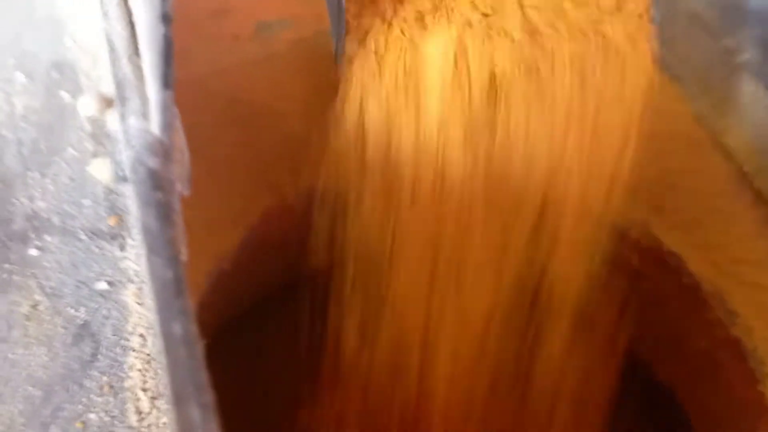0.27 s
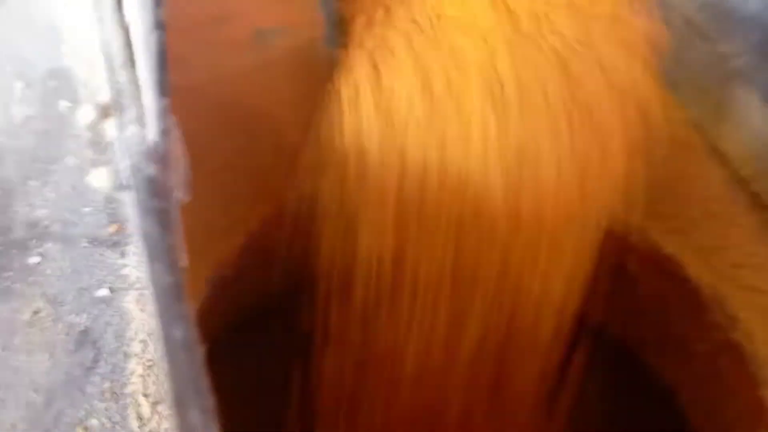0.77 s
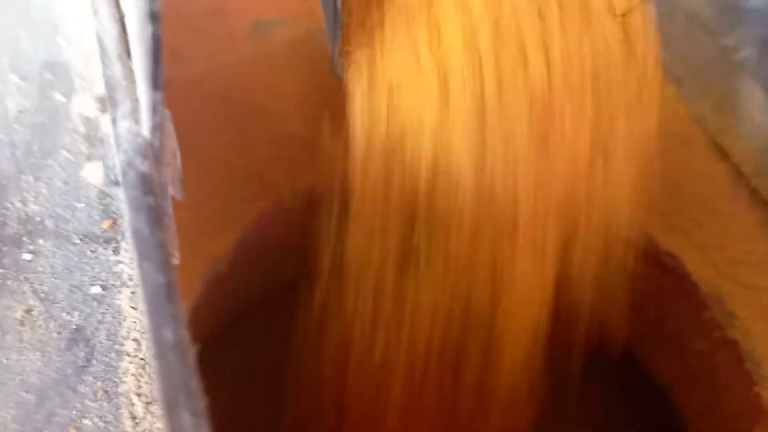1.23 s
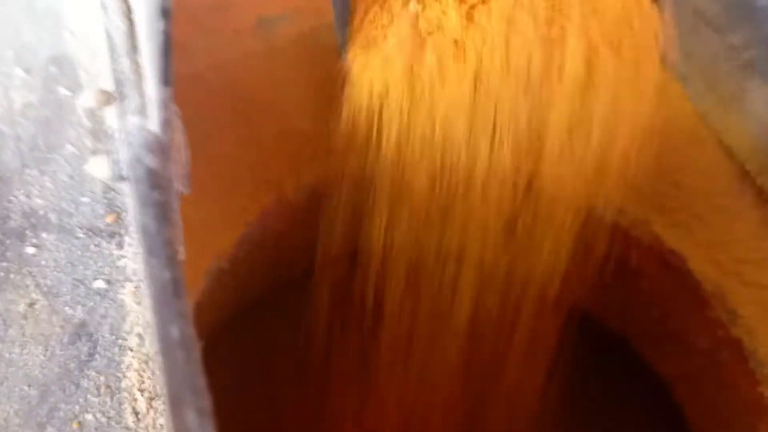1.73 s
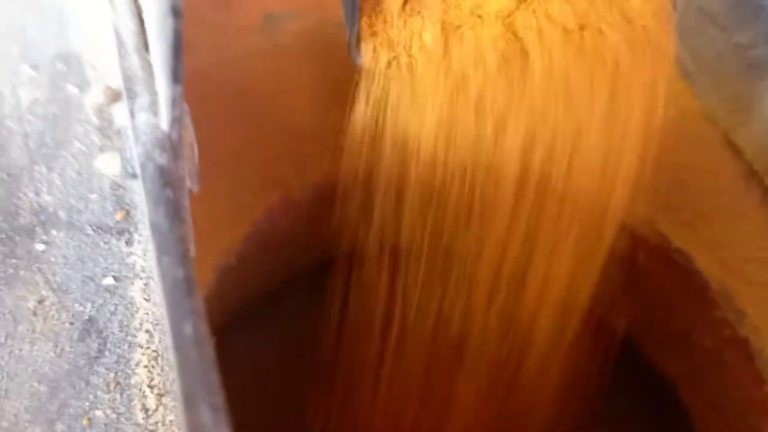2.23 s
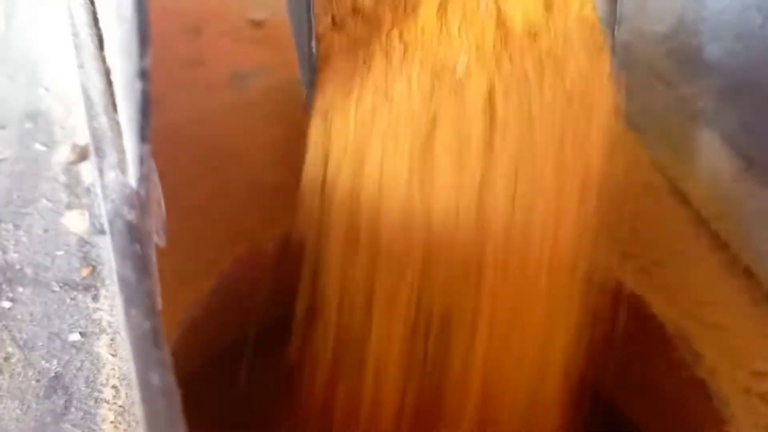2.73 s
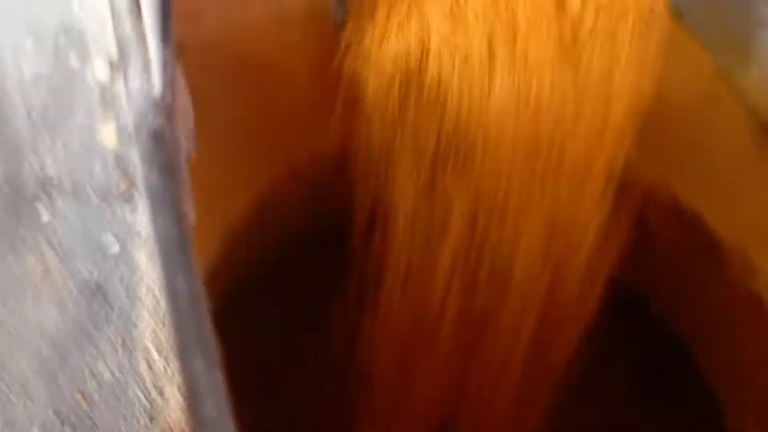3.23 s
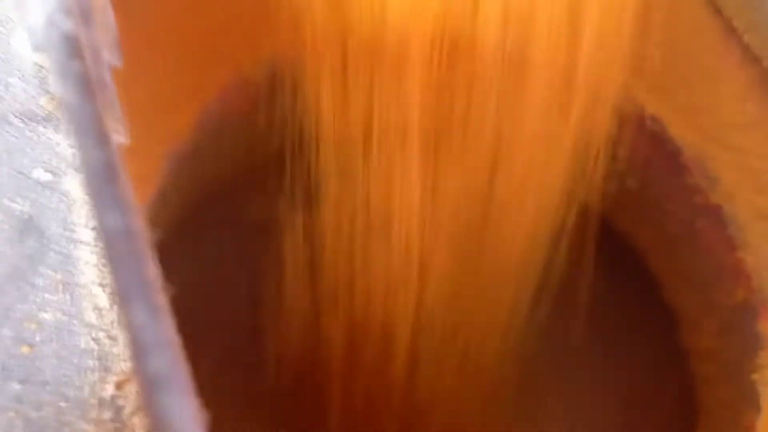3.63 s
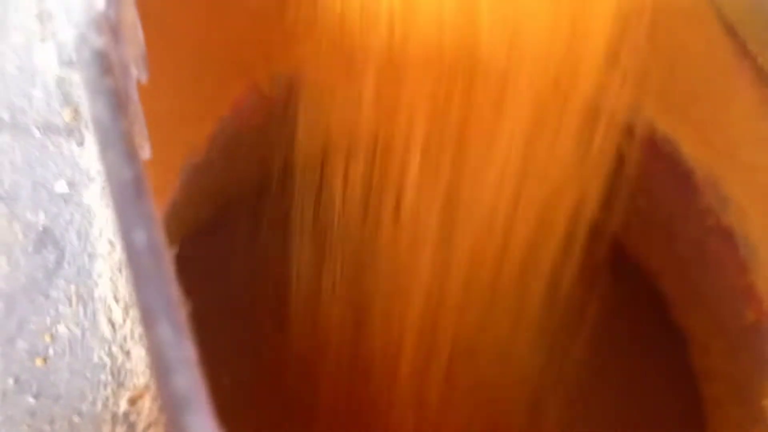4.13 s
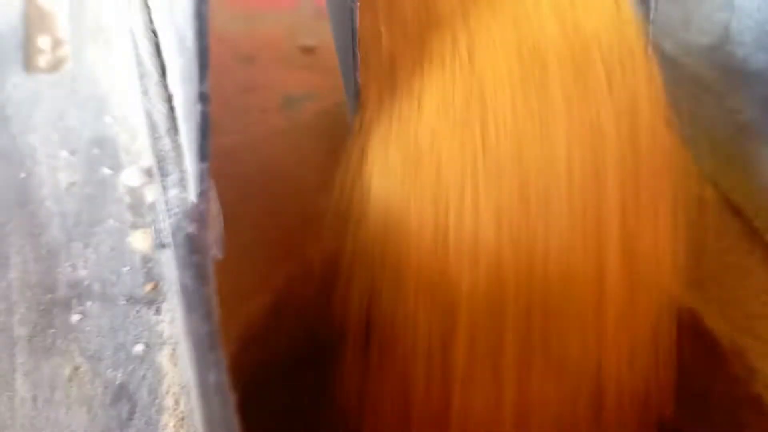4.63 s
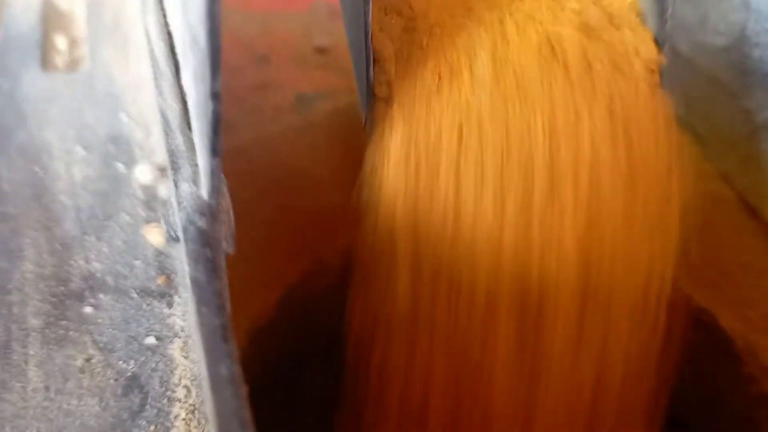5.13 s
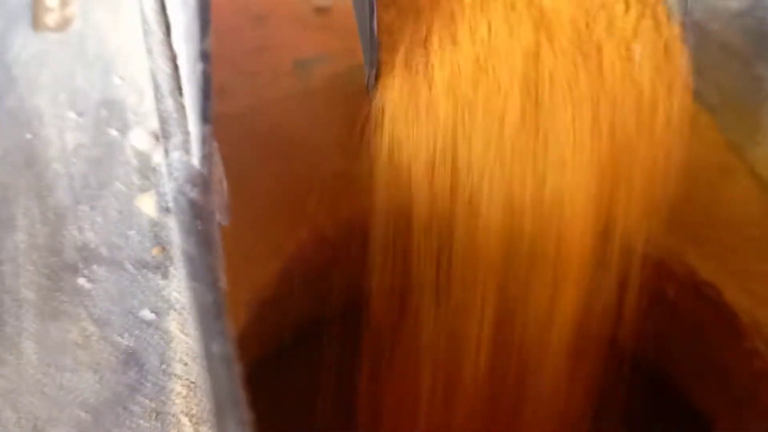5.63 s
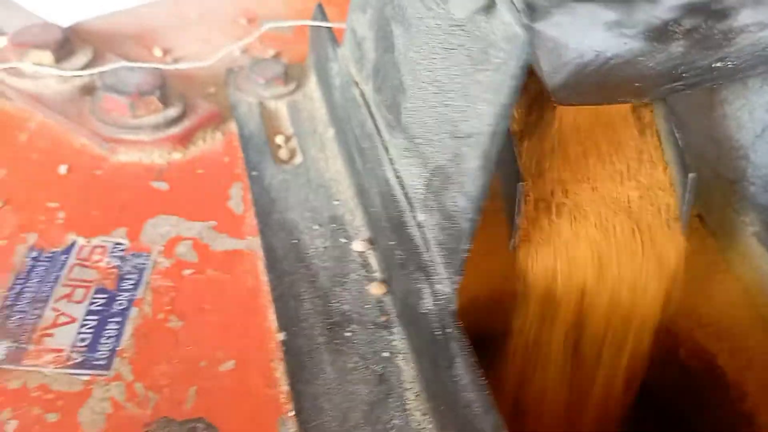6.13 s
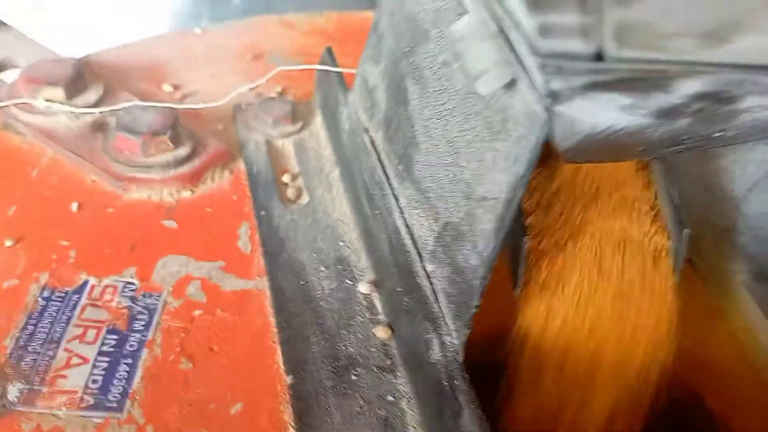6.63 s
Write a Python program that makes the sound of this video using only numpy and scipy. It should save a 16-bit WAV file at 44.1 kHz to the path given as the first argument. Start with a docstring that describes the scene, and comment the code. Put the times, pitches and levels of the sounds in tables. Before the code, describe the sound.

A grain mill roars overwhelmingly loud and close, a throbbing low-mid growl with rattling blows and hissing kernels, then weakens slightly near the end.

```python
"""Beside a steel chute a hammer mill grinds grain, so close that the microphones overload.
The rotor hums in tones on multiples of its hammer beat, which sags under load; the frame rumbles in filtered noise.
Slugs of grain and drive knocks ring the housing's modes over its throbbing noise roar; kernels hiss and ring plates.
Near the end the scene jumps from below the chute to its other side, with the feed thin and the roar weaker."""
import sys
import numpy as np
from scipy import signal
from scipy.io import wavfile
from scipy.ndimage import uniform_filter1d

SR = 44100
rng = np.random.default_rng(int(sys.argv[2]) if len(sys.argv) > 2 else 0)


def master_out(mix):
    """Clip the mix to full scale and print it as 16-bit PCM to the path in sys.argv[1]."""
    frames = np.transpose(np.atleast_2d(mix))
    ceiling = np.clip(frames, -1, 1)
    pcm = np.round(ceiling * 32767).astype(np.int16)
    wavfile.write(sys.argv[1], SR, pcm)


N = 303849

# Rotor hum. Each row: multiple of the pass rate, level below the chute in dB, level beside it in dB,
# dB gained for each pass a second lost to load.
HUM_TONES = [(1, -25, -26.5, 0.65), (2, -22, -28, -0.28), (3, -10.5, -14, -0.5), (3.5, -21, -44, 0.5),
             (4, -15.5, -19.5, -1.48), (4.5, -20, -23.5, -2.7)]
# Roar of the housing, below and beside the chute. Each row: frequency in Hz, relative density in dB per Hz.
ROAR_COLOUR_BELOW = [(60, -58), (150, -22), (260, -15), (330, 0.5), (420, 3), (520, -0.5), (600, -16),
                     (750, -29), (840, -11.5), (950, -20.5), (1500, -31.5), (1720, -28.5), (1900, -64),
                     (2400, -46.5)]
ROAR_COLOUR_BESIDE = [(40, -52), (150, -32), (260, -19.5), (330, -2), (450, 4), (560, 1.5), (640, -16.5),
                      (780, -20.5), (1100, -18.5), (1600, -18.5), (2400, -40.5)]
# Hiss of breaking kernels. Each row: frequency in Hz, relative density in dB per Hz.
HISS_COLOUR = [(880, -3), (1500, -13), (1800, 2), (2370, -1.5), (2770, -2), (3020, -1.5), (3460, -4.5),
               (4590, -8.5), (5310, -8), (6140, -12), (6970, -6), (7610, -7.5), (10100, -1), (11100, -3.5),
               (15300, -29.5)]
# Steel plates rung by grain, ahead of their shared drifting gain. Each row: frequency in Hz,
# width of the sharper resonance in Hz, level below the chute in dB, level beside it in dB, against the hiss.
CHUTE_PLATES = [(2965, 66, -13, -10.5), (5340, 34, -22.5, -20), (7220, 330, -17.5, -16),
                (9000, 200, -40, -27), (9830, 54, -14, -12)]
# Stereo likeness of the roar. Each row: frequency in Hz, left-right likeness from 0 to 1.
ROAR_LIKENESS = [(60, 0.6), (400, 1), (700, 0.96), (1300, 0.43), (2400, 0.12)]
# Stereo lean, below and beside the chute. Each row: frequency in Hz, left minus right in dB.
STEREO_LEAN_BELOW = [(60, -11), (150, 6), (380, 1), (940, -1.5), (2370, 1), (5930, 2), (14900, 7.5)]
STEREO_LEAN_BESIDE = [(60, -5.5), (150, 0), (380, -1), (940, -4.5), (2370, 0), (5930, -0.5), (14900, 2.5)]
# Rotor speed before its small flutter. Each row: time in seconds, hammer passes a second.
ROTOR_SPEED = [(0, 115.2), (1.1, 115.2), (1.35, 116), (1.6, 114.7), (2.25, 114.7), (2.65, 116.7),
               (3, 116.9), (3.85, 114), (4.25, 113.8), (4.65, 115.1), (4.95, 115.1), (5.65, 110.7),
               (5.95, 110.2), (5.99, 116.8), (6.89, 116.7)]
# Housing modes rung by a blow. Each row: frequency in Hz, width in Hz, level in dB.
HOUSING_MODES = [(166.8, 5.3, -4.5), (278, 32, 1.5), (400.8, 19.5, 15.5), (503.8, 27, 7.5), (862, 98, -5),
                 (1296, 95, -2), (1684, 98, -9.5)]
# Grain in the mill. Each row: time in seconds, level against a full feed in dB.
GRAIN_FEED = [(0, 1), (.28, 0.5), (.55, 0), (.94, 1), (1.1, -1), (1.4, -2), (1.55, 0.5), (2.3, 1),
              (2.5, -4.5), (2.8, -10.5), (3.1, -6.5), (3.3, 0), (4.3, 0.5), (4.65, -1.5), (5.0, 0.5),
              (5.94, 1), (6, -11), (6.89, -9)]

STEP_S = 5.97  # the jump to the other side of the chute
LEAD_S = 9e-5  # the nearer microphone hears the mill this much earlier
EDGE_HZ = 15470  # top of the recorded band
IDLE_HZ, START_PASS = 117.2, .35  # unloaded passes a second; pass count at the start
MAINS_HZ, MAINS_DB = 100, -37
# Levels at a full feed in dB, then dB gained for each dB of feed
ROAR_DB, ROAR_PER_FEED, ROAR_BESIDE_DB = -6, 0.39, -0.5
THUDS_DB, THUDS_PER_FEED = -24.5, 2.4
RUMBLE_DB, RUMBLE_PER_FEED = -64, 0.89
RUMBLE_DB_PER_LOAD = 6  # for each pass a second lost
HISS_DB, HISS_BESIDE_DB, HISS_PER_FEED = -25.5, -2.5, -0.064  # a thin feed sounds brighter
KNOCK_EVERY, KNOCK_AT = 12, 2  # passes per cycle of the drive, and the pass that knocks
KNOCK_DB, HALFWAY_DB = -35, -4.5  # a weaker knock follows half a cycle later
KNOCK_BESIDE_DB = 0.5


def gain_of(db):
    """Turn dB into amplitude."""
    return 10 ** (np.asarray(db) / 20)


def evened(x):
    """Bring a signal to rms 1."""
    return x / np.sqrt(np.mean(x ** 2) + 1e-20)


def read(points, hz):
    """Read a curve along a logarithmic frequency axis."""
    f, value = np.transpose(points)
    return np.interp(np.log(hz + 1), np.log(f + 1), value)


def beside(t):
    """0 below the chute, 1 beside it, with a 25 ms crossfade."""
    return np.clip((t - STEP_S) / 0.025 + .5, 0, 1)


def wander(rate_hz):
    """Random drift of rms 1, slower than the given rate."""
    b, a = signal.butter(2, rate_hz, fs=SR)
    drift = signal.lfilter(b, a, rng.standard_normal(N + SR))
    return evened(drift[SR:])  # drop the filter's first second


def resonate(x, hz, width_hz):
    """A two-pole resonance, brought to rms 1."""
    r = np.exp(-np.pi * width_hz / SR)
    poles = [1, -2 * r * np.cos(2 * np.pi * hz / SR), r * r]
    return evened(signal.lfilter([1, 0, -1], poles, x))


def noise(size, below, aside, same, patchy_db):
    """Two channels of random short-time spectra in drifting patches, coloured for each place, rms 1 overall."""
    hop = size // 4
    frames, hz = N // hop + 5, np.fft.rfftfreq(size, 1 / SR)
    a, b, c, d, patches = rng.standard_normal((frames, len(hz), 5)).T
    patches = uniform_filter1d(patches, 8, 0)  # smooth along frequency
    patches = evened(uniform_filter1d(patches, 8, 1))  # then along time
    place = beside(np.arange(frames) * hop / SR)
    colour_below, colour_beside = [evened(gain_of(read(s, hz)))[:, None] for s in (below, aside)]
    colour = (1 - place) * colour_below + place * colour_beside
    like = np.clip(same(hz), 0, 1)[:, None]
    left = a + 1j * b
    right = like * left + np.sqrt(1 - like ** 2) * (c + 1j * d)
    spectra = np.array([left, right]) * colour * gain_of(patchy_db * patches)
    return evened(signal.istft(spectra, nperseg=size, noverlap=size - hop)[1][:, :N])


def feed():
    """Grain in the mill at every sample, dB."""
    return np.interp(np.arange(N) / SR, *np.transpose(GRAIN_FEED))


def rotor_turns():
    """Hammer passes counted up with a slight flutter, and the load as passes a second lost."""
    hz = np.interp(np.arange(N) / SR, *np.transpose(ROTOR_SPEED))
    fluttering_hz = hz * (1 + .0012 * wander(12))
    return START_PASS + np.cumsum(fluttering_hz) / SR, IDLE_HZ - hz


def frame(load):
    """Low rumble of the shaking frame, nearly alike in both microphones; grows with feed and load."""
    shared, left, right = rng.standard_normal((3, N))
    b, a = signal.butter(1, [30, 100], "band", fs=SR)
    shaking = signal.lfilter(b, a, shared + 0.29 * np.array([left, right]))
    rumble_db = RUMBLE_DB + RUMBLE_PER_FEED * feed() + RUMBLE_DB_PER_LOAD * load
    return gain_of(rumble_db) * evened(shaking)


def hum(turns, load):
    """Tones on multiples of the pass rate, each wavering in strength, and the motor's mains hum."""
    t = np.arange(N) / SR
    place = beside(t)
    tones = gain_of(MAINS_DB) * np.sin(2 * np.pi * MAINS_HZ * t)
    for k, below_db, aside_db, load_db in HUM_TONES:
        tone_db = below_db + place * (aside_db - below_db) + load_db * load + 1.0 * wander(8.7)
        # the tones keep in step with the hammer passes, give or take
        phase = 2 * np.pi * k * (turns - .15) + .5 * rng.standard_normal()
        tones = tones + gain_of(tone_db) * np.sin(phase)
    return np.sqrt(2) * tones


def ring(blows):
    """Blows land over a millisecond and ring the housing, which is too stiff to radiate deep bass."""
    pushes = np.convolve(blows, np.hanning(SR // 1000), "same")
    pushes = signal.lfilter(*signal.butter(2, 130, "high", fs=SR), pushes)
    return sum(gain_of(db) * resonate(pushes, hz, width) for hz, width, db in HOUSING_MODES)


def knocks(turns):
    """A heavy knock in the housing once in every cycle of the drive, a weaker one halfway, whatever the feed."""
    halves = np.floor(2 * (turns - KNOCK_AT) / KNOCK_EVERY)
    strikes = np.diff(halves, prepend=halves[0]) > 0
    size_db = HALFWAY_DB * (halves % 2) + 0.86 * rng.standard_normal(N)
    knock_db = KNOCK_DB + KNOCK_BESIDE_DB * beside(np.arange(N) / SR)
    return gain_of(knock_db) * ring(strikes * gain_of(size_db))


def housing(turns):
    """The casing roars in throbs; every second hammer throws a slug of grain, of uneven size, against it."""
    roar = noise(size=2048, below=ROAR_COLOUR_BELOW, aside=ROAR_COLOUR_BESIDE,
                 same=lambda hz: read(ROAR_LIKENESS, hz), patchy_db=1.5)
    throb_db = 1.27 * np.cos(np.pi * turns - .8) + 1.36 * np.cos(2 * np.pi * turns - .8)
    roar_db = ROAR_DB + ROAR_PER_FEED * feed() + ROAR_BESIDE_DB * beside(np.arange(N) / SR)
    # slugs land a little early or late
    blows = np.diff(np.floor(turns / 2 + .075 * wander(40)), prepend=0) > 0
    sizes = blows * (1 + 0.7 * rng.standard_normal(N))
    thuds = gain_of(THUDS_DB + THUDS_PER_FEED * feed()) * ring(sizes)
    return gain_of(roar_db + throb_db) * roar + thuds


def grain(turns, load):
    """Hiss of breaking kernels, bursting with the slugs under load, with noise-driven ringing chute plates."""
    place = beside(np.arange(N) / SR)
    hiss = noise(size=512, below=HISS_COLOUR, aside=HISS_COLOUR, same=lambda hz: 0.066 + 0 * hz, patchy_db=1.8)
    plates = 0
    for hz, width, below_db, aside_db in CHUTE_PLATES:
        ringing = resonate(rng.standard_normal((2, N)), hz, width)
        ringing = resonate(ringing, hz, 3 * width)  # steepens the skirts
        plates = plates + gain_of(below_db + place * (aside_db - below_db)) * ringing
    plates_db = 1.7 * wander(3) - 1.2 + 1.4 * place
    slugs_db = 1.4 * np.tanh(load / 2) * np.cos(np.pi * turns + 2.6)
    passes_db = 0.2 * np.cos(2 * np.pi * turns + 2.7) + 0.14 * np.cos(np.pi * turns / 3)
    pour_db = HISS_DB + HISS_BESIDE_DB * place + HISS_PER_FEED * feed()
    clumps_db = 0.073 * wander(56) + 0.15 * wander(300)  # the feed comes in clumps
    return gain_of(pour_db + slugs_db + passes_db + clumps_db) * (hiss + gain_of(plates_db) * plates)


def scene():
    """The mill at two microphones: levels lean by frequency, one side leads, and the lead swaps at the step."""
    turns, load = rotor_turns()
    mill = frame(load) + hum(turns, load) + knocks(turns) + housing(turns) + grain(turns, load)
    hz, t, spectra = signal.stft(mill, SR, nperseg=512)
    place, side = beside(t), np.array([.5, -.5])[:, None, None]
    lean_db = np.outer(read(STEREO_LEAN_BELOW, hz), 1 - place) + np.outer(read(STEREO_LEAN_BESIDE, hz), place)
    lead = 2 * np.pi * LEAD_S * np.outer(hz, 1 - 2 * place)  # phase, radians
    placed = spectra * gain_of(side * lean_db) * np.exp(1j * side * lead)
    return signal.istft(placed, SR, nperseg=512)[1][:, :N]


def record(dry):
    """Lopsided microphones, a limiter, an input stage that flattens peaks, a bass cut, full scale and band limit."""
    lopsided = dry + 0.0063 * dry ** 2  # pushes are sensed larger than pulls
    swing = np.sqrt(2 * abs(uniform_filter1d(lopsided ** 2, size=SR // 250, axis=1)))
    held = lopsided / (1 + (swing / 2.36) ** 4) ** 0.39  # a quick limiter holds back the biggest swings
    ceiling, knee, give = .89, 14, .03
    flattened = held / (1 + abs(held / ceiling) ** knee) ** (1 / knee) + give * held
    treble = signal.sosfilt(signal.butter(4, 1800, "high", fs=SR, output="sos"), dry)
    through = flattened + .42 * treble  # some treble rides on over the flat tops
    coupled = signal.lfilter(*signal.butter(1, 15, "high", fs=SR), through)
    edge = signal.firwin(2047, EDGE_HZ, window=("kaiser", 9), fs=SR)[None]
    return signal.oaconvolve(np.clip(coupled, -1, 1), edge, "same")


dry = scene()
out = record(dry)
master_out(out)
```